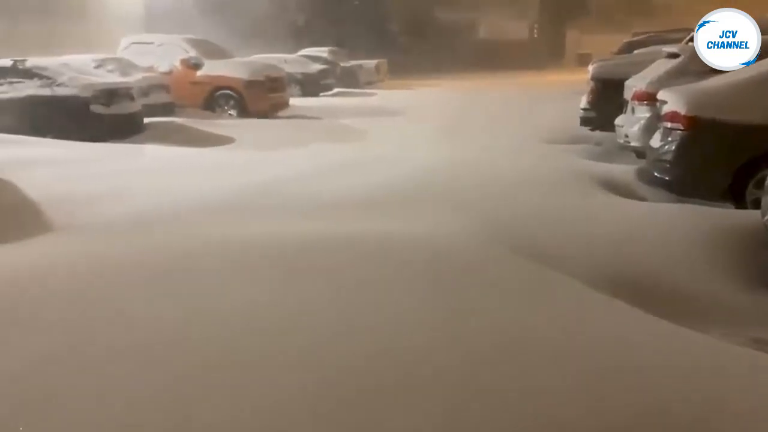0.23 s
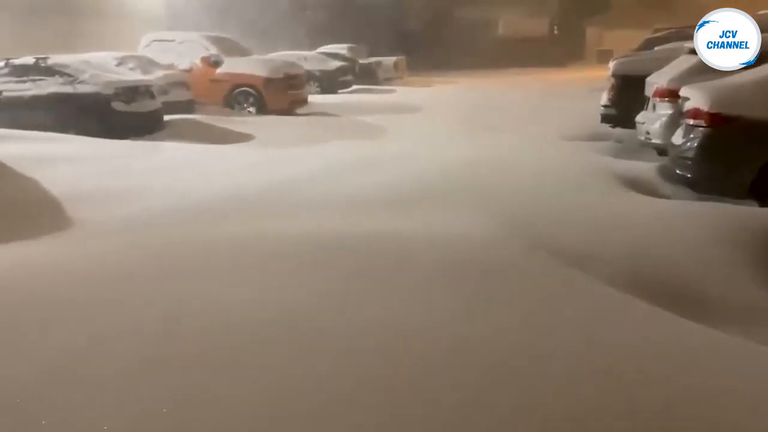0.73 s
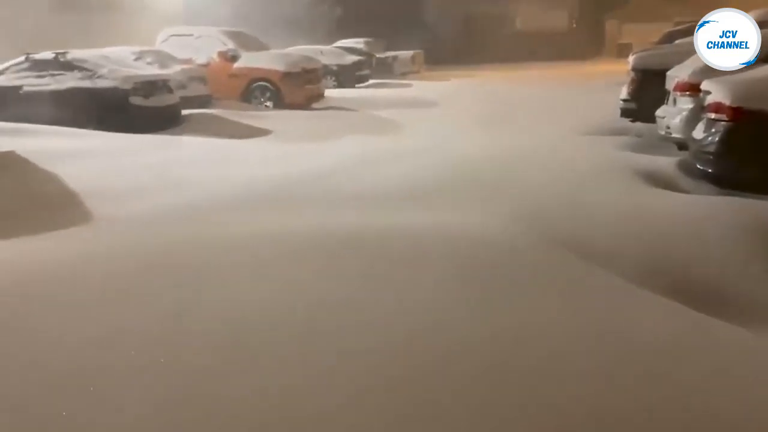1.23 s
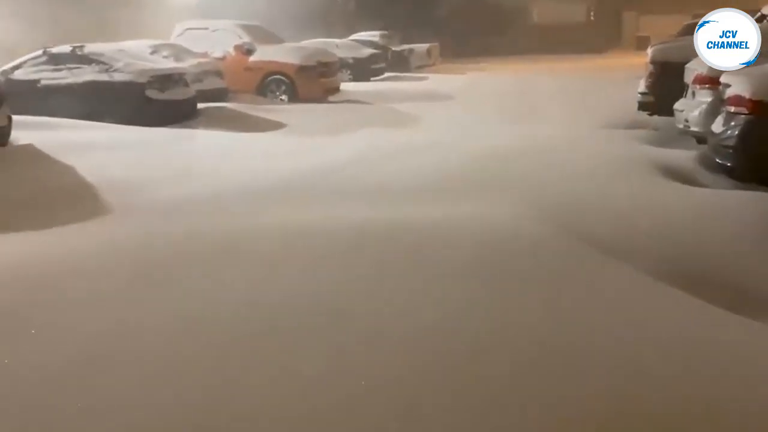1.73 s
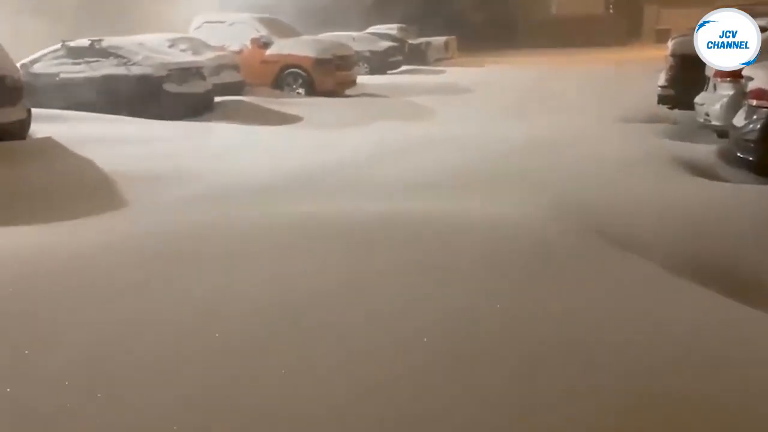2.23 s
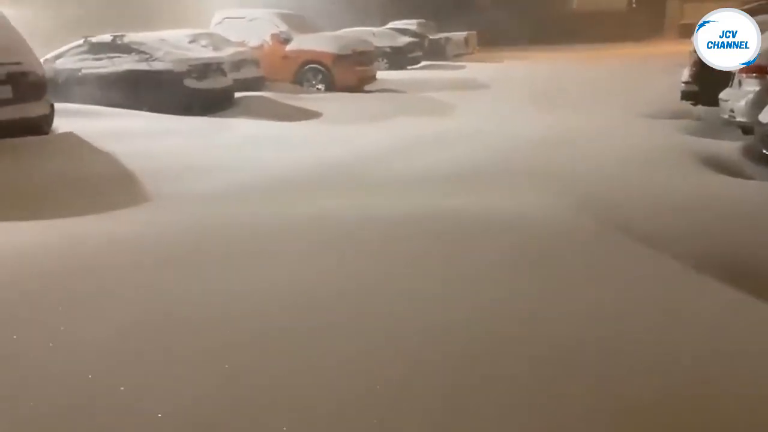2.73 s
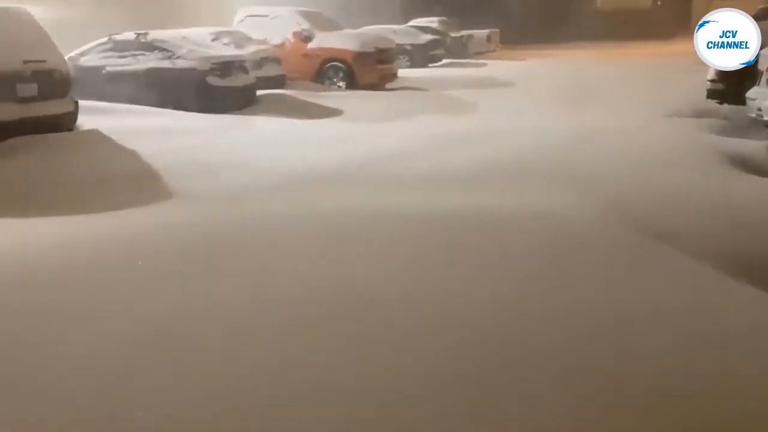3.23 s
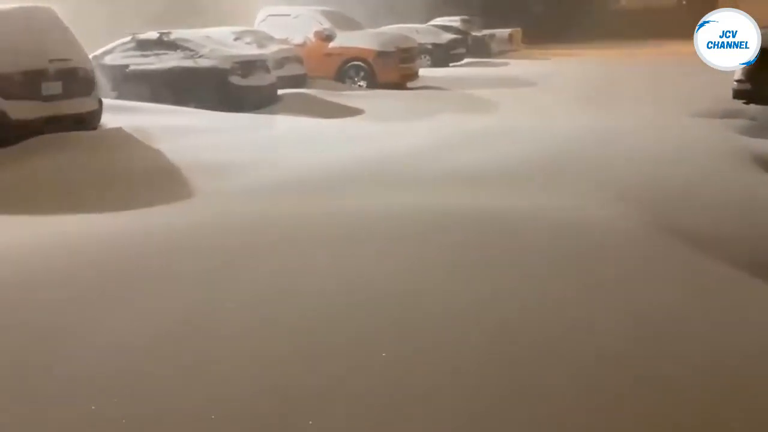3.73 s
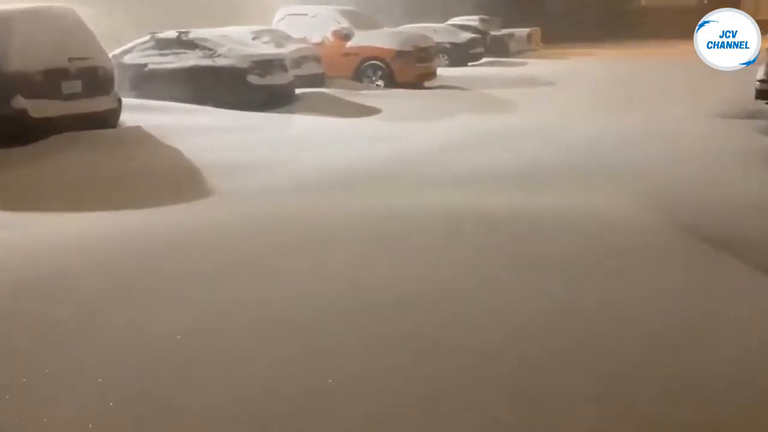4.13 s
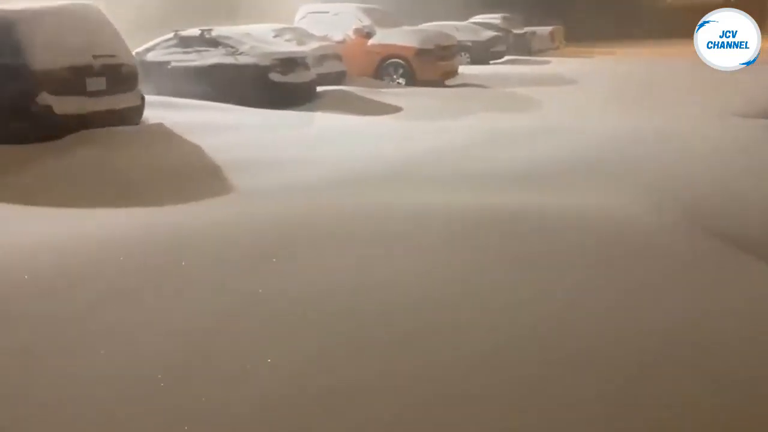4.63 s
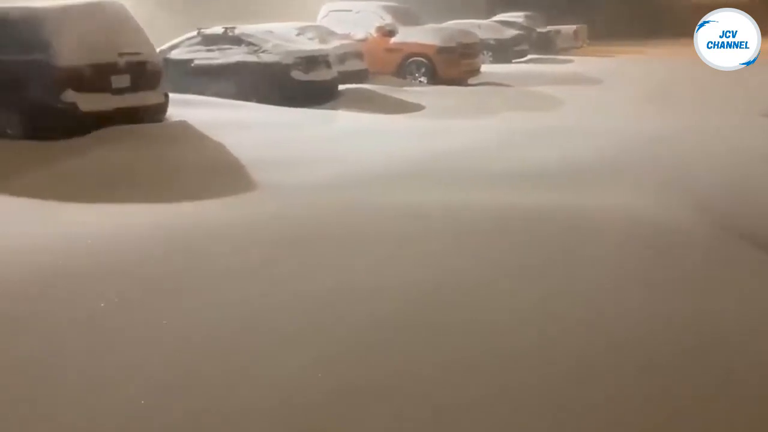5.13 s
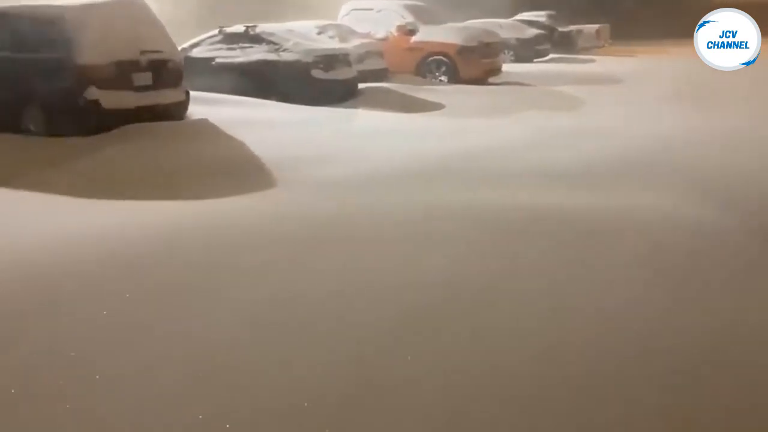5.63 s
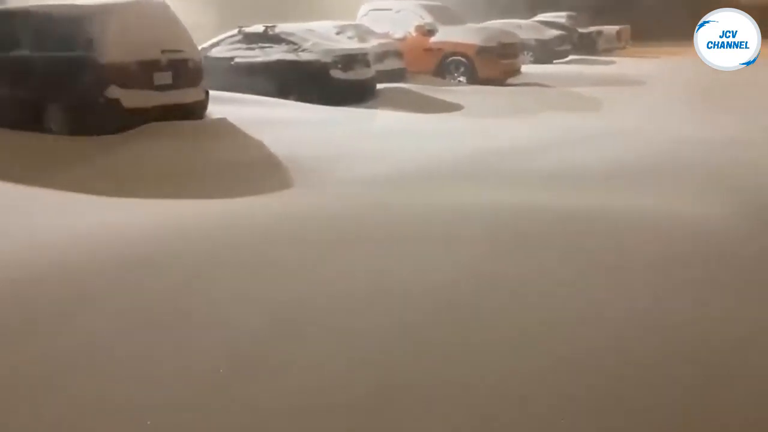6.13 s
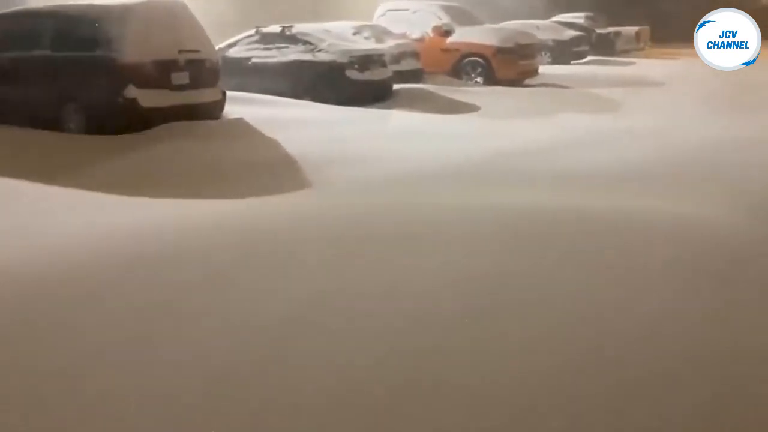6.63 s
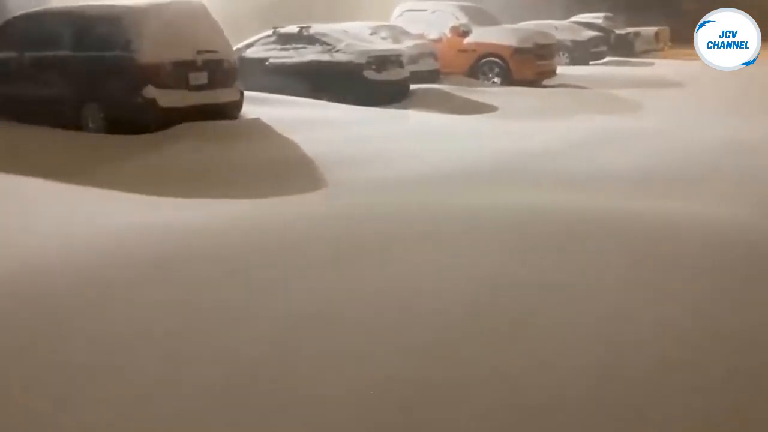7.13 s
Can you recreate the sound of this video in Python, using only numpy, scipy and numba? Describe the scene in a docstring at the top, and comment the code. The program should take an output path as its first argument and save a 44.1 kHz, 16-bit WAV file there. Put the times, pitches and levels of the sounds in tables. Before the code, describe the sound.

Blizzard wind strikes a handheld microphone in a snow-filled car park at night. A short gust drops away to near quiet, then returns in uneven low buffets, rumbles and falling whumps. Small dry snow grains tick occasionally on the housing. After about five seconds the roar becomes stronger and more continuous, with harder knocks, over faint distant wind and hiss.

```python
"""A blizzard blows across a handheld microphone in a snowed-in car park, far wind and a faint hiss behind it.
In the first second the wind drops low between gusts; then eddies buffet and knock the port over a lumpy rumble,
and vortices sweep it with falling whumps. Snow grains tick on the housing from 1.4 s, sharpest at 5.2 s.
From about 5.3 s the roar is strong and reaches highest at the end.
Wind, rumble and hiss are shaped noise; whumps are falling sines, knocks filtered impulses, grains noise bursts."""
import sys
import numpy as np
from scipy import signal
from scipy.fft import rfft, irfft, next_fast_len
from scipy.io import wavfile
from scipy.ndimage import uniform_filter1d
from numba import njit

SR = 44100
rng = np.random.default_rng(int(sys.argv[2]) if len(sys.argv) > 2 else 0)


def digitize_waveform(pressure):
    """Quantize a signal to 16-bit integers and store it at the path in sys.argv[1].

    Rows of a 2-D input are taken as channels; values are limited to [-1, 1].
    """
    field = np.atleast_2d(pressure).T
    bounded = np.clip(field, -1, 1)
    quanta = np.round(bounded * 32767).astype(np.int16)
    wavfile.write(sys.argv[1], SR, quanta)


N = 325899
TIME = np.arange(N) / SR
SIZE = next_fast_len(N)
FREQS = np.maximum(np.arange(SIZE // 2 + 1) * SR / SIZE, 1)


def port_turbulence(port_hz=31, bright_thinning_db=4.5, buffet_evens=0.63):
    """Wind, gusts, lulls and buffets drive roar and rumble; the microphone drops the deepest bass."""
    # wind at the port before any surge: t/s, roar level/dB per octave, knee f/Hz above which the roar falls
    wind = [(0.04, -36.5, 457), (0.15, -59, 166), (0.68, -69.5, 330), (0.81, -37, 442), (1.1, -52, 224),
            (1.22, -42.5, 600), (1.59, -42.5, 650), (2.2, -37.5, 663), (3.08, -42.5, 1145),
            (3.36, -41.5, 1046), (3.42, -48.5, 598), (3.87, -49, 800), (3.94, -37, 1070),
            (4.73, -43.5, 562), (4.85, -38.5, 910), (5.2, -44.5, 770), (5.34, -34, 1320),
            (6.13, -33.5, 707), (6.91, -32.5, 1020), (7.39, -35, 1660)]
    # gusts on the wind: t/s, time to release/s, level change/dB, knee lift/octaves, extra rumble level/dB
    gusts = [(0.315, 0.091, 25.5, 0.65, -5), (0.775, 0.14, 4, 0.7, -1.5), (1.625, 0.15, 1.5, 0.43, 4.5),
             (2.205, 0.06, -1, 0.51, -1), (3.01, 0.19, 15, -0.22, 3.5), (4.25, 0.45, 15, -0.34, -2.5),
             (4.738, 0.09, 10, -0.39, 0), (5.523, .13, 4, 0.21, -10.5), (5.717, 0.066, 7.5, 0.25, 0),
             (5.85, 0.13, 4.5, 0.69, 4.5), (6.215, 0.13, 3.5, 0.66, 0.5), (6.442, 0.19, 0, 0.78, 2),
             (6.71, 0.12, 5, 0.49, -2.5), (6.97, 0.23, 1.5, 0.17, 2)]
    # big eddies hitting the port: t/s of full strength, hold/s, level change/dB, knee lift/octaves
    buffets = [(0.022, 0.01, 1, -0.099), (0.21, 0.055, 29.5, -0.57), (0.271, 0.0043, 29, -0.51),
               (0.735, 0.004, 17.5, 1.8), (0.767, 0.0095, 14.5, 0.28), (0.818, 0.019, 4, 0.99),
               (1.01, 0.054, 7, 0.44), (1.119, 0.032, 11, 0.72), (1.29, 0.01, 7, 0.43),
               (1.441, 0.0017, 3, 1), (1.483, 0.0025, 10, 0.78), (1.499, 0.0097, 11.5, 0.86),
               (1.674, 0.026, 9.5, 0.51), (1.718, 0.019, 11, 0.22), (1.774, 0.0044, 17, 0.35),
               (1.804, 0.016, 10.5, 0.89), (1.854, 0.0063, 12.5, 0.86), (1.933, 0.0058, 5.5, 0.97),
               (2.082, 0.0043, 15, -0.87), (2.138, 0.015, 19.5, -1.5), (2.248, 0.001, 12, 0.64),
               (2.259, 0.00073, 24.5, -1.85), (2.278, 0.0039, 6.5, 0.85), (2.408, 0.005, 1.5, 1.1),
               (2.447, 0.0071, 3.5, 1.46), (2.478, .003, -5, 0.79), (2.514, 0.0024, 5, 1.1),
               (2.654, 0.004, 7, 0.39), (2.707, 0.004, 4, 1), (2.772, 0.0033, 8, 0.78),
               (2.813, 0.008, 2, 1), (2.98, 0.005, 6.5, 0.39), (3.042, 0.0095, 6, 0.61),
               (3.083, 0.002, -4, 0.68), (3.122, 0.012, 9, 0.058), (3.177, 0.012, 6, -0.12),
               (3.237, 0.017, 4, 0.49), (3.354, 0.019, 8, 0.87), (3.486, 0.033, 23, -1.46),
               (3.646, 0.002, 10, 1.4), (3.585, 0.019, 2, 0.31), (3.923, 0.032, 4.5, 0.25),
               (4.03, 0.052, 0, 0.27), (4.075, 0.017, 4.5, 0.66), (4.168, 0.029, 5.5, 0.5),
               (4.226, 0.004, 11, -0.57), (4.266, 0.0017, 3, -1.1), (4.287, 0.043, 6.5, 0.14),
               (4.348, 0.017, 13, 0.18), (4.409, 0.057, 4.5, 0.42), (4.489, 0.014, 12, -0.22),
               (4.533, 0.015, 3, -0.41), (4.571, 0.022, 6.5, 0.27), (4.664, 0.024, -5.5, 1.13),
               (4.78, 0.04, 9, 0.027), (4.994, 0.042, 6, 0.39), (5.151, 0.0018, 11, 0.3),
               (5.244, 0.0066, 17, 0.16), (5.428, 0.0036, 0, 0.74), (5.612, 0.0053, 15, -0.98),
               (5.64, 0.042, 9.5, -0.28), (5.848, 0.0034, 6.5, 0.47), (5.915, 0.03, 1, 0.37),
               (5.968, 0.0076, 6, -0.26), (6.037, 0.057, 3.5, 0.48), (6.187, 0.02, 12.5, 0.52),
               (6.32, 0.025, -1.5, 1), (6.442, 0.006, 4.5, 1.1), (6.482, 0.004, 0, 0.34),
               (6.5, 0.0027, -2, -0.35), (6.62, 0.023, 6, 0.31), (6.742, 0.025, -2, 0.75),
               (6.869, 0.021, 7.5, 0.59), (6.957, 0.0045, 4, 0.45), (7.0, 0.028, 10.5, 0.38),
               (7.058, 0.027, 6, 0.14), (7.245, 0.0077, 2.5, 0.33), (7.335, 0.0039, 4.5, 0.33)]
    # mostly slack air between gusts: t/s, time to release/s, roar level change/dB, rumble level change/dB
    lulls = [(1.085, 0.023, -17, -29), (1.16, 0.015, -5, -10), (1.462, 0.014, -11, -20),
             (1.585, 0.049, 3.5, -17), (1.945, 0.029, -6, 1), (3.065, 0.08, -2.5, -7.5),
             (3.14, 0.063, 1, -15), (3.203, 0.029, -9, 4), (3.405, 0.09, -1.5, -5.5),
             (3.665, 0.032, -12, -10), (3.8, 0.055, -5, -15), (3.875, 0.031, -0.5, -7),
             (4.11, 0.03, -15, 2), (4.24, 0.013, 1, 8), (4.326, 0.0069, -2, -7.5), (4.378, 0.022, -11, 0),
             (4.41, 0.058, -2, -14), (4.458, 0.015, -12, -4), (4.61, 0.038, -4, 2.5),
             (4.685, 0.045, -7, -8), (4.94, 0.037, -13, -7), (5.075, 0.054, -2, -13), (5.175, 0.078, -1, 0),
             (5.295, 0.02, -4, 6), (5.345, 0.066, 4, -5), (5.443, 0.028, -16, -4), (5.49, 0.043, -0.5, -4),
             (5.698, 0.03, -5, -0.5), (6.095, 0.053, 1, -1.5), (6.365, 0.048, -3, -5),
             (6.672, 0.025, -7, 2.5), (6.84, 0.031, -8, -3), (6.905, 0.047, -2, -13),
             (7.035, 0.015, -5.5, 2), (7.185, 0.012, -1.5, -11), (7.095, 0.033, -5.5, -1),
             (7.265, 0.027, -4.5, 1.5)]
    # the largest eddies, moving only the rumble: t/s, time to release/s, level change/dB
    bass_swells = [(0.01, 0.033, 3), (0.96, 0.015, 10.5), (1.64, 0.019, 5), (2.79, 0.034, 4),
                   (3.035, 0.018, 5), (4.24, 0.029, 9.5), (4.305, 0.019, 4), (4.47, 0.069, 0.5),
                   (4.645, 0.085, 8), (4.79, 0.057, 1.5), (5.545, 0.062, 11.5), (5.872, 0.0234, 5.5),
                   (6.1, 0.1, 4), (6.205, 0.021, 10), (6.82, 0.012, 7), (7.01, 0.023, 3.5),
                   (7.09, 0.028, -1.5)]
    # how strongly little eddies break up the roar, before buffets even it: t/s, raggedness/ratio
    raggedness_curve = [(0.0, 2.5), (2.6, 1.73), (4.4, 2.4), (5.6, 1.74), (7.39, 1.65)]

    wind_db, knee_hz = in_time(wind)
    gust_db, gust_lift, extra_rumble_db = surges(gusts, attack_s=0.025, release_s=0.039)
    buffet_db, buffet_lift = surges(buffets, attack_s=0.0092, release_s=0.0083, lead_s=0.0092)
    # in a lull the air dies away and returns abruptly
    roar_lull_db, rumble_lull_db = surges(lulls, attack_s=0.0066, release_s=0.0063)
    bass_db, = surges(bass_swells, attack_s=0.0036, release_s=0.0036)

    # the flow never holds still
    flutter_hz, flutter_db, flutter_octaves = 12.4, 2, 0.12
    flutter = drift(flutter_hz)
    flow_db = wind_db + gust_db + flutter_db * flutter
    lift = gust_lift + buffet_lift + flutter_octaves * flutter

    # a middling roar, the rumble that goes with it, and the share of the roar's swing the rumble takes
    breeze_db, breeze_rumble_db, rumble_follows = -38.5, -30.5, 0.82
    rumble_db = breeze_rumble_db + rumble_follows * (flow_db - breeze_db)
    rumble_db = rumble_db + extra_rumble_db + rumble_lull_db + bass_db

    # a buffet is one full body of air, less ragged than the flow around it
    raggedness = in_time(raggedness_curve)[0] * from_db(-buffet_evens * buffet_db)
    slackened_db = flow_db + roar_lull_db
    rush = bass_lags(roar(slackened_db + buffet_db, knee_hz * 2 ** lift, raggedness))
    strays = stray_vortices(slackened_db, knee_hz * 2 ** gust_lift)
    # a bright buffet is small and has little bass
    thump_db = buffet_db - bright_thinning_db * buffet_lift
    pressure = rush + rumble(rumble_db, thump_db) + whumps(strays) + knocks()
    return butter(pressure, port_hz, "high", order=4)


def roar(level_db, knee_hz, raggedness, knee_scale=0.89, trim_db=0.3, ragged_db=4.0,
         ragged_octaves=0.04, damping=2.68, hold_s=0.0085):
    """Eddies of every size down to the knee; smaller ones die out at 24 dB an octave."""
    # roar before the knee filter: f/Hz, relative level/dB per octave
    roar_spectrum = [(30, -26.5), (65, -1.5), (130, -2.5), (240, -2), (450, 0.5), (680, 2), (900, -0.5),
                     (1080, -0.5), (1350, -3), (2000, -3.5), (4000, -2.5), (12000, 14.5)]
    # from level per octave to gain per frequency bin
    shape = on_bins(roar_spectrum) / np.sqrt(FREQS * np.log(2) * SIZE / SR)
    air = even_noise(shape, 80, count=13, steady_cycles=4.5)
    # each little eddy makes the air louder and brighter at once
    ragged = small_eddies() * raggedness
    edge_hz = knee_scale * knee_hz * 2 ** (ragged_octaves * ragged)
    edge_hz = np.clip(edge_hz, SR / 700, SR / 8)
    tangent = np.tan(np.pi * edge_hz / SR)
    air = moving_lowpass(air * from_db(level_db + ragged_db * ragged), tangent, np.sqrt(2))
    air = moving_lowpass(air, tangent, damping)
    # the wind supplies the power of all octaves under the knee; the eddies only share it out
    power_below = np.interp(knee_hz * np.exp(-1 / 4), FREQS, np.cumsum(shape ** 2))
    power = from_db(level_db + trim_db) ** 2 * power_below
    return evened(air, hold_s) * np.sqrt(np.abs(smooth(power, hold_s)))


def small_eddies(per_s=110, fade_s=0.0043, rise_s=0.0012):
    """A hail of little eddies, each a quick rise in air speed that fades; mean 0, spread about 1."""
    hits = (rng.random(N) < per_s / SR) * rng.uniform(0.083, 1, N)
    speed = lagged(lagged(hits, fade_s), rise_s)
    speed = rms_one(speed - smooth(speed, 0.031))
    return 3 * np.tanh(speed / 3)  # the strongest rises are rounded


def bass_lags(x, lag_cycles=1.17, lag_hz=70.4):
    """Large eddies pass more slowly, so every flap droops: lag = cycles / (pitch + lag_hz)."""
    size = next_fast_len(N + SR)
    hz = np.arange(size // 2 + 1) * SR / size
    turns = lag_cycles * np.log1p(hz / lag_hz)
    return irfft(rfft(x, size) * np.exp(-2j * np.pi * turns), size)[:N]


def rumble(level_db, swell_db, thump_share=0.41, thump_lag_s=0.0086, lumpy_db=2.5):
    """The largest eddies; the low thump of a buffet follows its first slap."""
    # rumble: f/Hz, relative level/dB per Hz
    rumble_spectrum = [(20, -36.5), (43, -7), (64, -2), (116, -7.5), (185, -15.5), (300, -26.5),
                       (500, -62.5), (900, -99)]
    air = even_noise(colour(rumble_spectrum), 28, count=8, steady_cycles=2.5)
    thump_db = thump_share * lagged(swell_db, thump_lag_s)
    return air * from_db(level_db + thump_db + lumpy_db * drift(49))


def whumps(strays, rise_s=0.0018, fade_s=0.0084, fall_s=0.00822, end_hz=70, wobble_octaves=0.24):
    """A vortex strikes the port and slows as it leaves: a few uneven swings, ever lower."""
    # vortices sweeping over the port: t/s, starting f/Hz before the wobble, envelope peak level/dB
    vortices = [(0.02, 480, -23.5), (0.876, 847, -19.5), (1.312, 284, -19), (1.416, 373, -24.5),
                (1.444, 460, -34), (1.675, 437, -13.5), (1.703, 380, -15.5), (1.732, 343, -23),
                (2.257, 415, -9.5), (2.777, 660, -21), (3.043, 400, -7.5), (3.074, 860, -18),
                (3.093, 553, -13), (3.125, 504, -8.5), (3.18, 450, -7), (3.212, 262, -14),
                (3.485, 515, -23), (3.512, 550, -27.5), (4.195, 480, -15), (4.263, 800, -10),
                (4.358, 570, -7), (4.511, 540, -10.5), (4.595, 613, -7), (4.63, 646, -20.5),
                (4.659, 470, -14), (4.747, 675, -26), (4.818, 388, -26), (5.243, 969, -19),
                (5.615, 686, -9.5), (5.972, 680, -12), (6.724, 607, -17.5), (6.819, 467, -11.5)]
    rows = [*vortices, *strays]
    out, age = np.zeros(N), np.arange(SR // 16) / SR
    unsteady = 2 ** (wobble_octaves * drift(250))
    envelope = (1 - np.exp(-(age / rise_s) ** 2)) * np.exp(-age / fade_s)
    envelope = envelope / envelope.max()
    for (s, start_hz, db), turn in zip(rows, rng.random(len(rows))):
        near = slice(int(s * SR), int(s * SR) + len(age))
        if near.stop <= N:
            hz = (end_hz + (start_hz - end_hz) * np.exp(-age / fall_s)) * unsteady[near]
            swings = np.sin(2 * np.pi * (np.cumsum(hz) / SR + turn))
            out[near] += from_db(db) * envelope * swings
    return out


def stray_vortices(flow_db, knee_hz, per_s=11, above_db=9, spread_db=6.5, pitch_share=0.719):
    """Lesser vortices come at random, their level and pitch following the flow: rows of s, Hz, dB."""
    gap, pitch, strength = rng.random((150, 3)).T
    s = np.cumsum(-np.log(1 - gap) / per_s)
    hz = np.minimum(pitch_share * np.interp(s, TIME, knee_hz), 900) * 2 ** (pitch - .5)
    db = np.interp(s, TIME, flow_db) + above_db + spread_db * (2 * strength - 1)
    return np.transpose([s, hz, db])


def knocks(half_width_octaves=0.47, lead_s=0.0015, level_db=-1.0):
    """A hard eddy is one kick of pressure: a swing or two around its pitch, little above its top."""
    # small hard eddies: t/s (kick comes lead_s sooner), peak level/dB before level_db, pitch f/Hz, top f/Hz
    hard_eddies = [(0.022, -22, 510, 800), (0.83, -24.5, 1300, 1870), (0.836, -23.5, 1260, 1700),
                   (0.877, -23.5, 670, 1100), (1.261, -27, 520, 800), (1.441, -30.5, 750, 900),
                   (1.501, -18, 550, 800), (1.688, -20.5, 700, 1400), (1.729, -25, 700, 900),
                   (1.778, -29, 705, 1700), (1.805, -21, 1100, 2400), (1.811, -14.5, 1060, 2450),
                   (1.935, -20.5, 860, 1580), (2.0, -25.5, 470, 900), (2.2464, -20, 920, 2200),
                   (2.28, -26.5, 870, 1300), (2.404, -29.5, 950, 1500), (2.478, -26, 597, 1300),
                   (2.889, -28, 654, 1800), (3.167, -24, 930, 1200), (3.177, -12, 900, 1100),
                   (4.16, -35, 1200, 1500), (4.183, -35, 850, 1200), (4.292, -13.5, 634, 800),
                   (4.323, -23, 646, 850), (4.412, -14, 560, 1200), (4.449, -18, 546, 800),
                   (4.485, -21.5, 730, 2000), (4.495, -10.5, 540, 750), (4.568, -15, 590, 900),
                   (4.661, -19.5, 596, 1400), (4.765, -24, 590, 800), (4.782, -15.5, 520, 750),
                   (4.797, -19, 520, 850), (4.831, -22.5, 850, 900), (4.841, -34, 1220, 2000),
                   (5.286, -28, 850, 1100), (5.337, -19, 650, 1200), (5.427, -20.5, 1050, 1100),
                   (5.617, -11, 663, 1000), (5.745, -18, 666, 1300), (5.849, -18.5, 750, 1300),
                   (5.927, -24, 1200, 1600), (5.971, -8.5, 594, 1100), (6.188, -19, 600, 1000),
                   (6.253, -21, 880, 1200), (6.314, -24.5, 1400, 2200), (6.332, -25, 1600, 4000),
                   (6.3411, -16.5, 1170, 3000), (6.434, -19, 880, 1800), (6.4496, -18.5, 1080, 2600),
                   (6.482, -21.5, 1090, 2400), (6.5, -14.5, 580, 2200), (6.581, -19, 930, 2400),
                   (6.668, -25.5, 940, 1200), (6.822, -17, 620, 1200), (6.869, -16, 804, 1100),
                   (6.9565, -21, 890, 1800), (6.974, -17, 830, 1100), (7.008, -13, 790, 1100),
                   (7.027, -24, 1000, 2200), (7.082, -17, 860, 1400), (7.202, -20.5, 980, 1100),
                   (7.301, -22, 800, 2000), (7.334, -19, 870, 1300)]
    out, kick = np.zeros(N), signal.unit_impulse(SR // 40)
    signs = rng.choice([-1, 1], len(hard_eddies))
    for (s, db, hz, top_hz), sign in zip(hard_eddies, signs):
        band_hz = [hz / 2 ** half_width_octaves, hz * 2 ** half_width_octaves]
        swing = butter(butter(kick, band_hz, "band"), top_hz, "low", order=3)
        start = int((s - lead_s) * SR)
        out[start:start + len(kick)] += sign * from_db(db + level_db) * swing / np.abs(swing).max()
    return out


def snow_grains(tick_s=0.00057, knock_s=0.00099, bounce_s=0.004, bounce_db=-18, body_db=2):
    """Each grain on the housing gives a dry tick, a duller knock and one small bounce."""
    # grains: t/s, tick peak level/dB, tick lowest f/Hz, tick highest f/Hz,
    # level of the low knock relative to the tick/dB before body_db
    grains = [(1.351, -49, 6000, 7600, -22), (2.332, -44, 4200, 7300, -6), (2.923, -49, 6000, 7600, -20),
              (3.6915, -50, 5800, 7300, -15), (3.9149, -39.5, 2000, 4600, 10.5),
              (5.2434, -20.5, 2000, 7800, -1.5), (6.4467, -31.5, 2000, 8000, -9),
              (7.0755, -34, 2000, 7500, 11)]
    out, age = np.zeros(N), np.arange(SR // 40) / SR
    for s, db, low_hz, high_hz, knock_db in grains:
        crack, thud = rng.standard_normal((2, len(age)))
        tick = butter(crack * np.exp(-age / tick_s), low_hz, "high", order=3)
        tick = butter(tick, high_hz, "low", order=8)
        knock = butter(thud * np.exp(-age / knock_s), [600, 2200], "band")
        knock = butter(knock, 2800, "low", order=4)
        hit = tick / np.abs(tick).max() + from_db(knock_db + body_db) * knock / np.abs(knock).max()
        for at, gain_db in ((s, 0), (s + bounce_s, bounce_db)):
            start = int(at * SR)
            out[start:start + len(age)] += from_db(db + gain_db) * hit[:N - start]
    return out


def background(far_db=-61.5, far_waver_db=.5, hiss_db=7.5, hiss_waver_db=1.14):
    """Smooth far wind over the snow, and a faint hiss that swells and sinks."""
    # far wind: f/Hz, relative level/dB per Hz
    far_spectrum = [(60, -23.5), (140, -14), (320, 8.5), (600, 0), (900, -3.5), (1150, -3.5), (1800, -9),
                    (2600, -12.5), (4000, -26), (7000, -68)]
    # hiss: f/Hz, relative level/dB per Hz
    hiss_spectrum = [(1500, 11), (3200, 5.5), (7000, 6), (9000, -1), (11500, 5.5), (15500, -2.5)]
    # course of the hiss: t/s, level/dB before hiss_db
    hiss_course = [(0.0, -77), (0.68, -76.5), (1.87, -72), (2.59, -75), (2.94, -72), (3.85, -74.5),
                   (4.28, -68), (4.51, -71.5), (5.02, -72.5), (5.8, -71.5), (6.5, -67.5), (7.39, -74)]
    far = irfft(noise_bins(colour(far_spectrum)), SIZE)[:N]
    far = far * from_db(far_db + far_waver_db * drift(0.64))
    hiss = irfft(noise_bins(colour(hiss_spectrum)), SIZE)[:N]
    return far + hiss * from_db(in_time(hiss_course)[0] + hiss_db + hiss_waver_db * drift(60))


def surges(rows, attack_s, release_s, lead_s=0):
    """Surges of air that rise, hold and let go: one control for each column after the two times."""
    controls = np.zeros((len(rows[0]) - 2, N))
    for s, hold_s, *amounts in rows:
        start, end = s - lead_s, s + hold_s + release_s
        near = slice(max(int(start * SR), 0), int(end * SR))
        rise, fall = (TIME[near] - start) / attack_s, (end - TIME[near]) / release_s
        controls[:, near] += np.outer(amounts, np.clip(np.minimum(rise, fall), 0, 1))
    return controls


def even_noise(gain, lowest_hz, count, steady_cycles):
    """Noise in overlapping bands half an octave apart, each held at a steady level."""
    bins, octave, out = noise_bins(gain), np.log2(FREQS), 0
    for hz in lowest_hz * 2 ** (np.arange(count) / 2):
        weight = np.maximum(1 - 2 * np.abs(octave - np.log2(hz)), 0)
        band = irfft(bins * weight, SIZE)[:N]
        out = out + evened(band, max(steady_cycles / hz, .005)) * np.std(band)
    return out


@njit
def moving_lowpass(x, tangent, damping):
    """Two-pole state-variable low-pass; tangent = tan(pi knee / SR) at every sample."""
    out, band_state, low_state = x.copy(), 0., 0.
    for i in range(len(x)):
        g = tangent[i]
        band = (band_state + g * (x[i] - low_state)) / (1 + g * (g + damping))
        out[i] = low_state + g * band
        band_state, low_state = 2 * band - band_state, 2 * out[i] - low_state
    return out


def drift(rate_hz):
    """Random wander of spread 1: noise under a two-pole low-pass at the rate, run at SR / 20."""
    r = np.exp(-40 * np.pi * rate_hz / SR)
    chance = rng.standard_normal(N // 20 + 2002)
    slow = signal.lfilter([1], [1, -2 * r, r * r], chance)[2000:]  # skip the settling
    return np.interp(np.arange(N) / 20, np.arange(len(slow)), rms_one(slow))


def from_db(db):
    """Decibels to gain."""
    return 10 ** (np.asarray(db) / 20)


def rms_one(x):
    """Scale to rms 1."""
    return x / np.sqrt(np.mean(x ** 2) + 1e-20)


def in_time(rows):
    """Each column of a curve, at every sample."""
    s, *columns = np.transpose(rows)
    return [np.interp(TIME, s, c) for c in columns]


def on_bins(points):
    """A spectrum as gain per frequency bin."""
    hz, db = np.transpose(points)
    return from_db(np.interp(np.log(FREQS), np.log(hz), db))


def colour(points):
    """A spectrum as gain per frequency bin, with total power 1."""
    gain = on_bins(points)
    return gain / np.sqrt(np.sum(gain ** 2))


def noise_bins(gain):
    """Random bins whose sound has the power of the given gains."""
    return rfft(rng.standard_normal(SIZE)) * gain * np.sqrt(SIZE / 2)


def smooth(x, seconds):
    """Triangular moving average."""
    size = max(int(seconds * SR), 1)
    return uniform_filter1d(uniform_filter1d(x, size), size)


def evened(x, seconds):
    """Take out level changes slower than the given time."""
    return x / np.sqrt(np.abs(smooth(x ** 2, seconds)) + 1e-12)


def lagged(x, seconds):
    """One-pole lag."""
    r = np.exp(-1 / (seconds * SR))
    return signal.lfilter([1 - r], [1, -r], x + 1e-12)


def butter(x, hz, kind, order=2):
    """Causal Butterworth filter."""
    sos = signal.butter(order, np.minimum(hz, SR / 2 - 100), kind, fs=SR, output="sos")
    return signal.sosfilt(sos, x + 1e-18)


def scene():
    """Everything meets at one microphone port."""
    return (port_turbulence() + snow_grains() + background())[None]


def record(dry):
    """The largest swings are rounded, the ends are eased and the top is cut."""
    top, ease_s, stop_hz = 0.87, .004, 16600  # the cut is 70 dB deep from stop_hz up
    ease = np.clip(np.minimum(TIME, TIME[-1] - TIME) / ease_s, 0, 1)
    rounded = top * np.tanh(dry / top)
    top_cut = signal.cheby2(16, 70, stop_hz, fs=SR, output="sos")
    return signal.sosfilt(top_cut, ease * rounded)


dry = scene()
out = record(dry)
digitize_waveform(out)
```